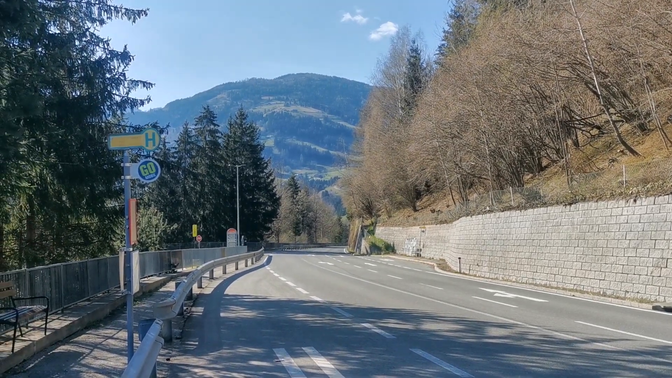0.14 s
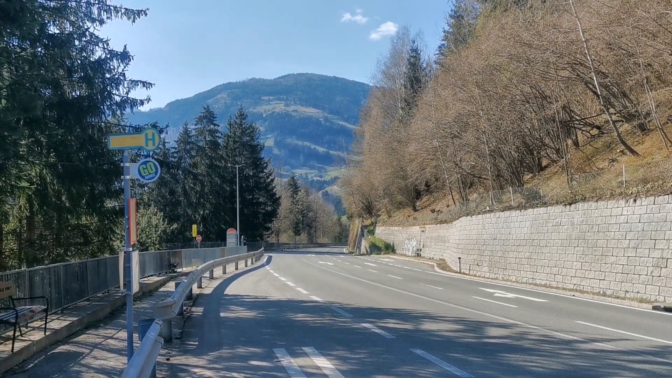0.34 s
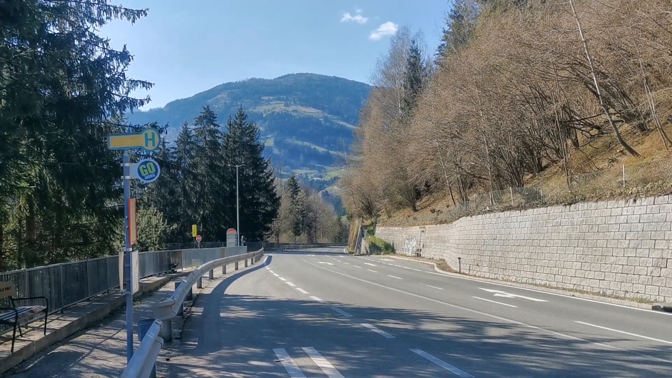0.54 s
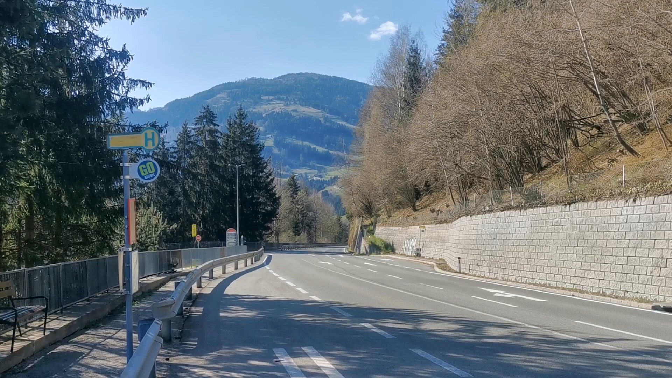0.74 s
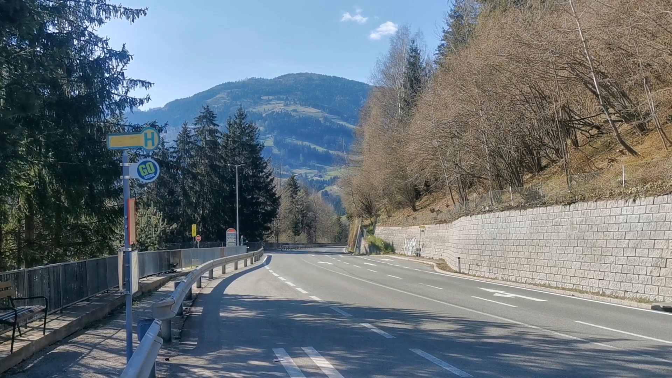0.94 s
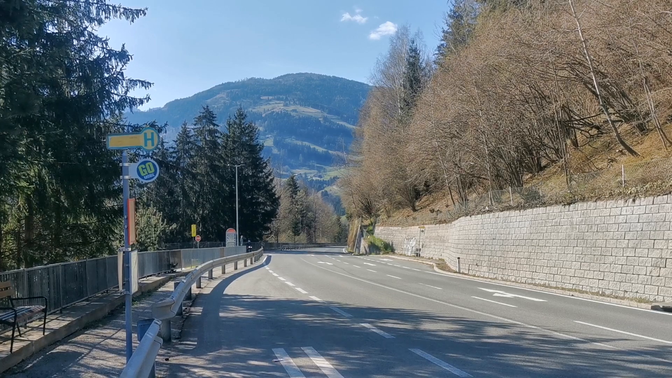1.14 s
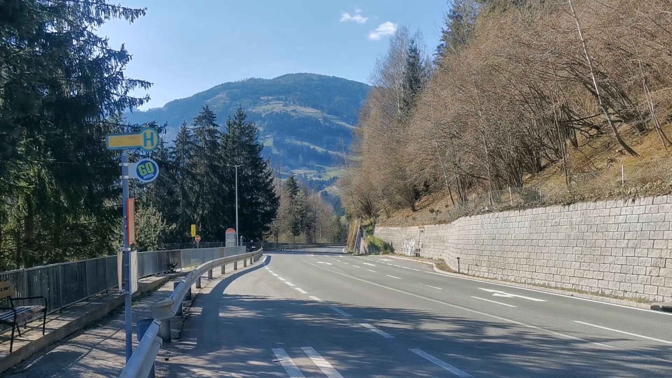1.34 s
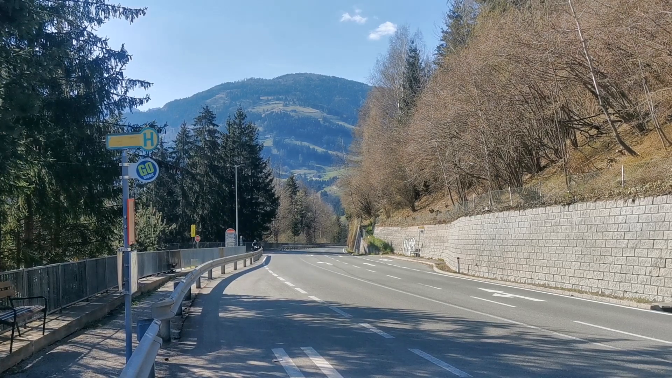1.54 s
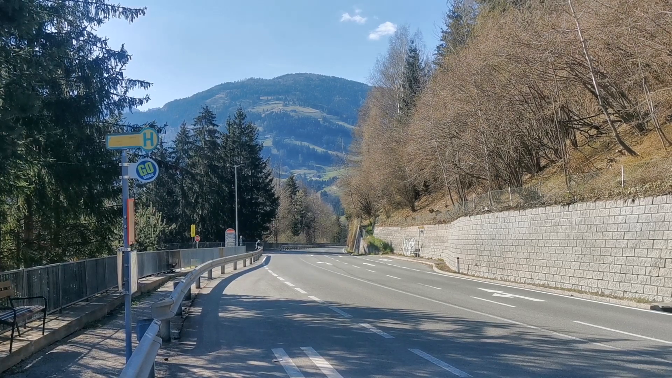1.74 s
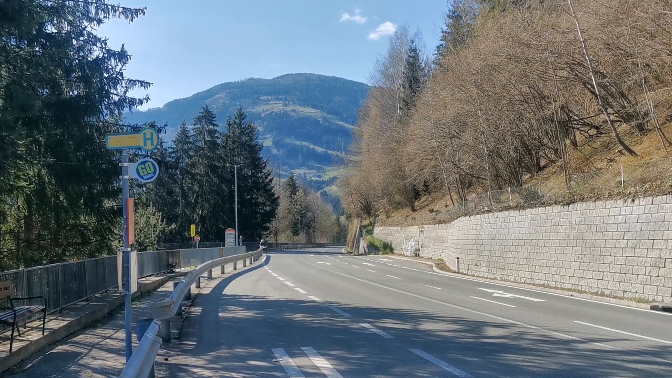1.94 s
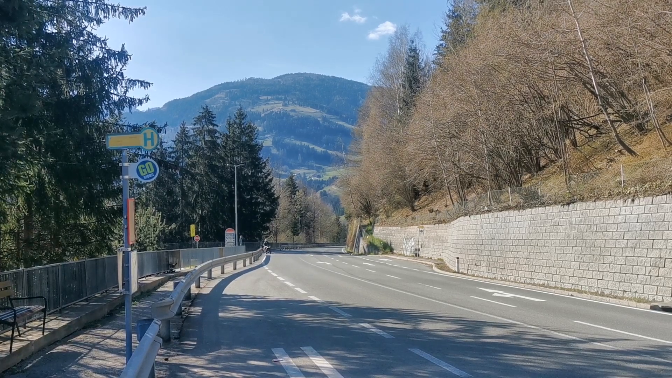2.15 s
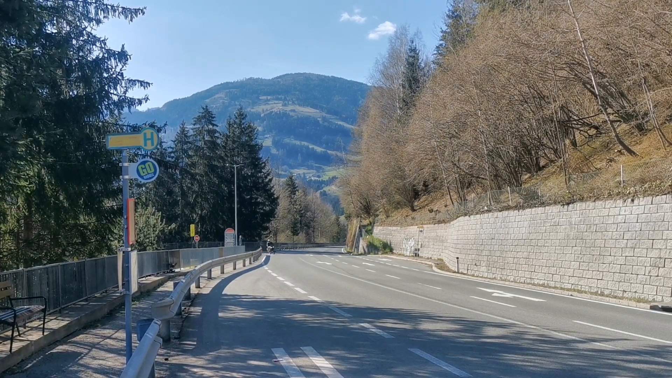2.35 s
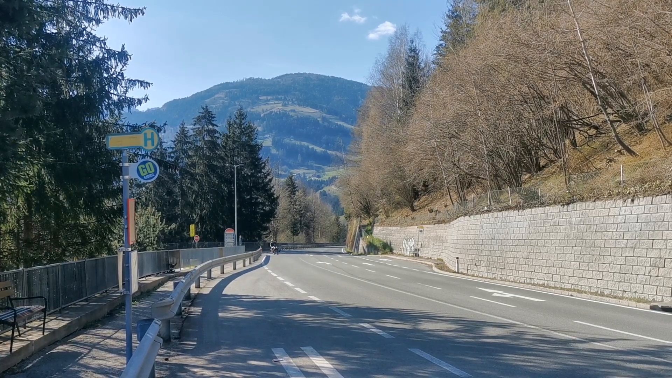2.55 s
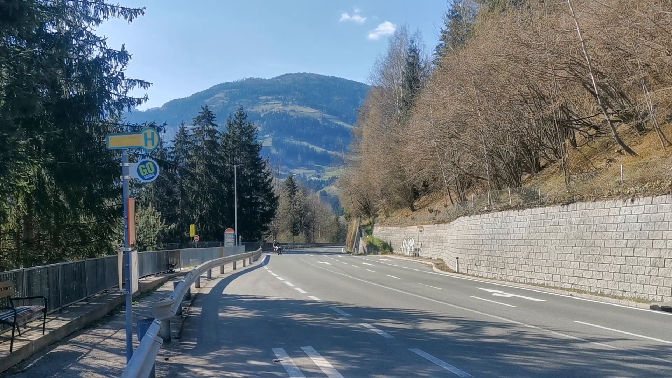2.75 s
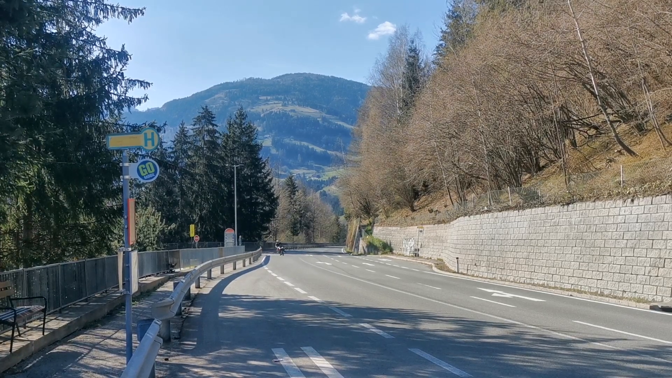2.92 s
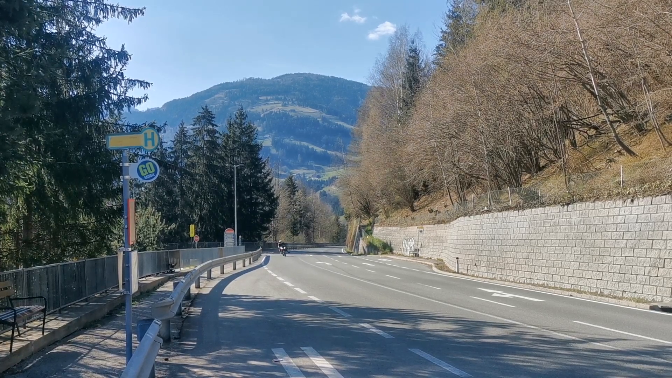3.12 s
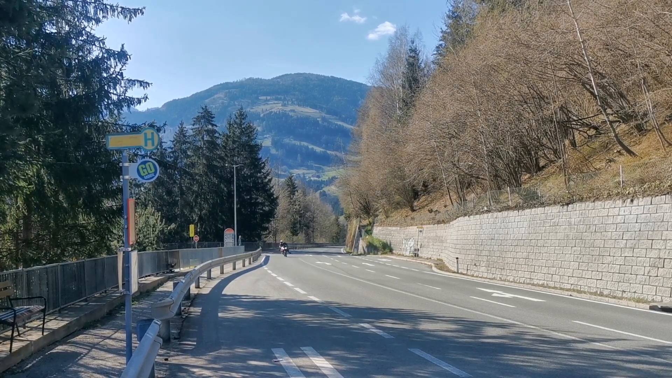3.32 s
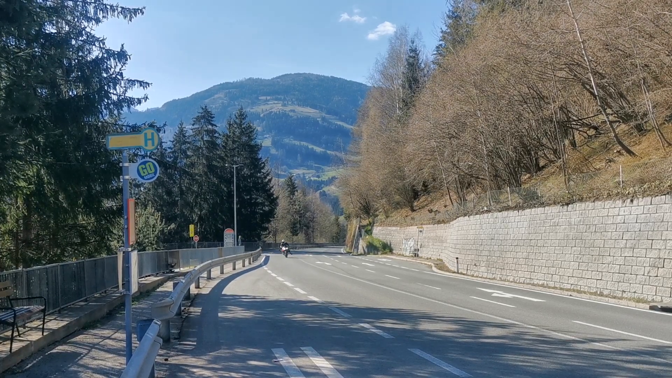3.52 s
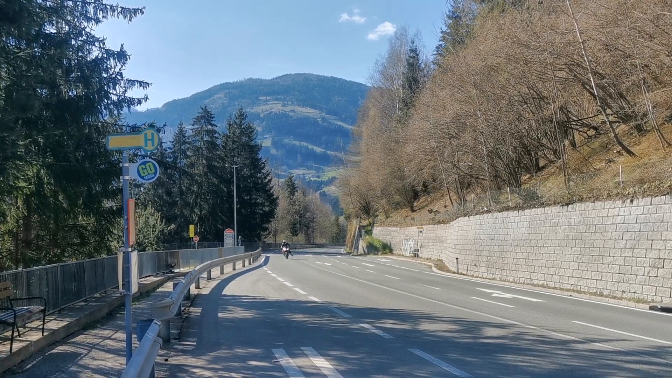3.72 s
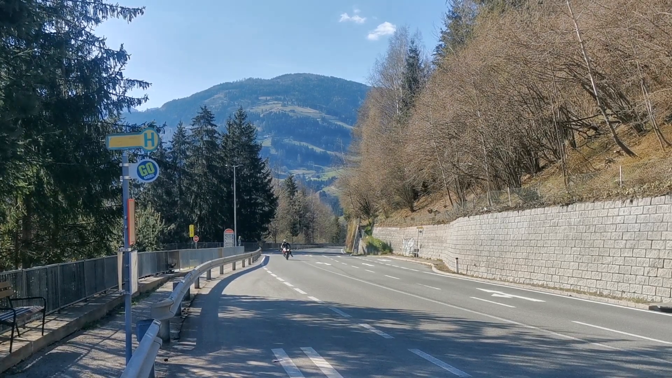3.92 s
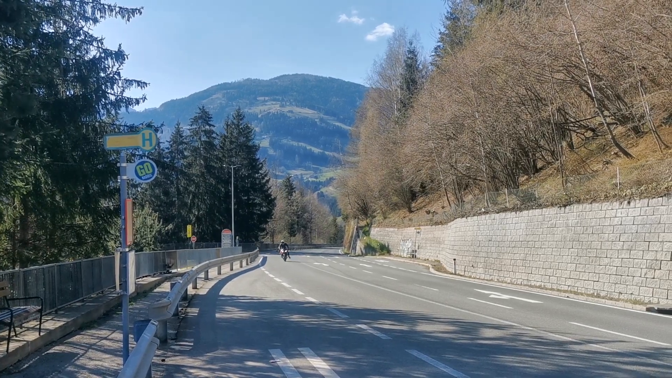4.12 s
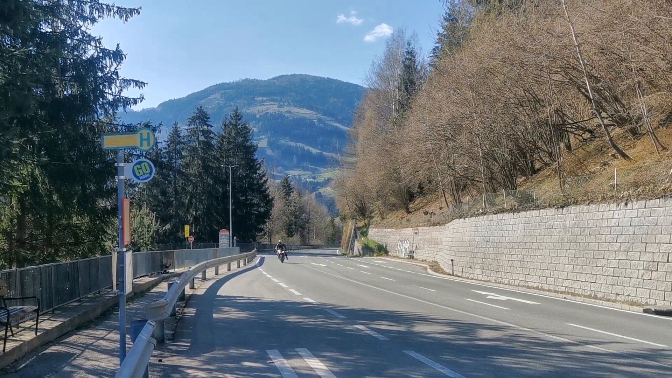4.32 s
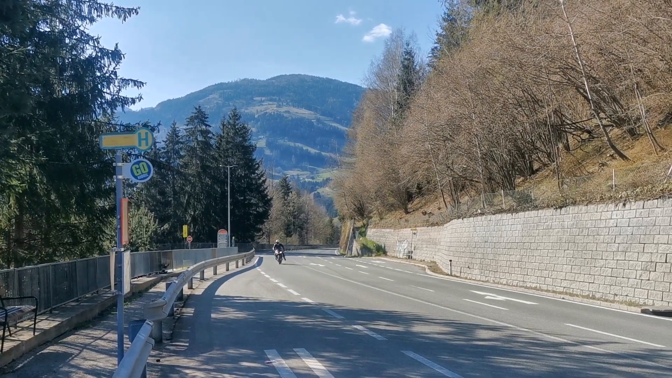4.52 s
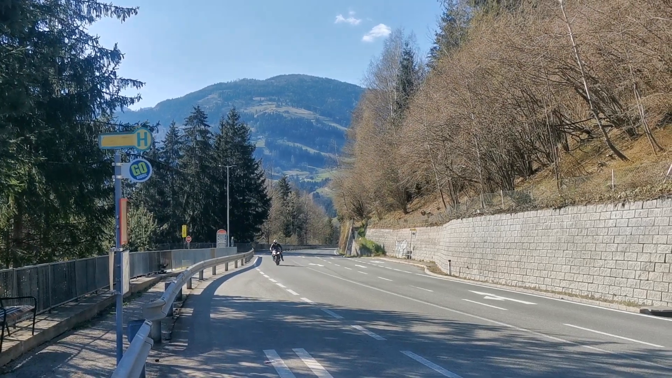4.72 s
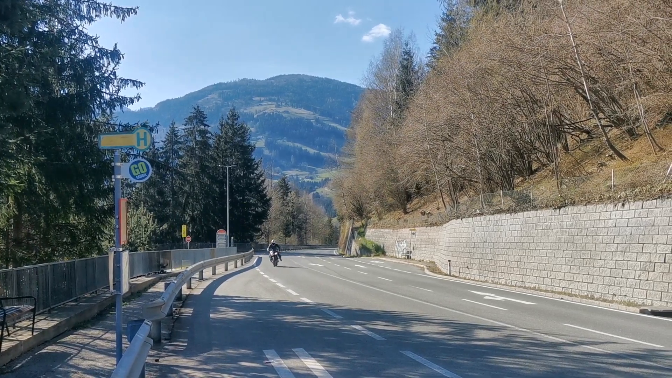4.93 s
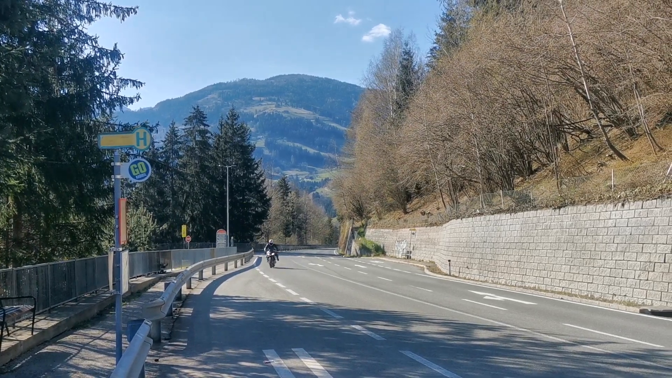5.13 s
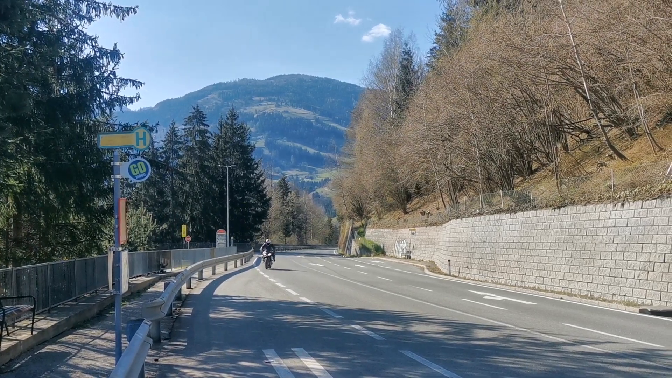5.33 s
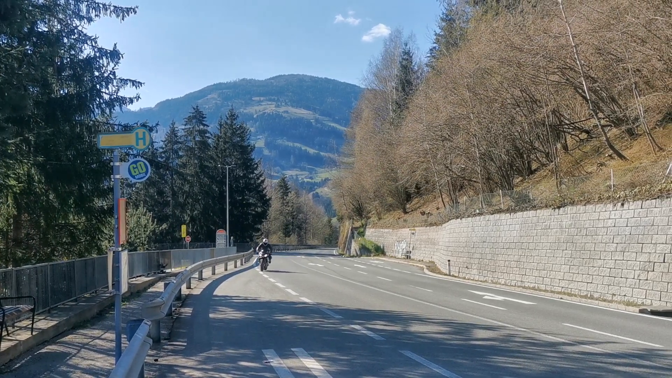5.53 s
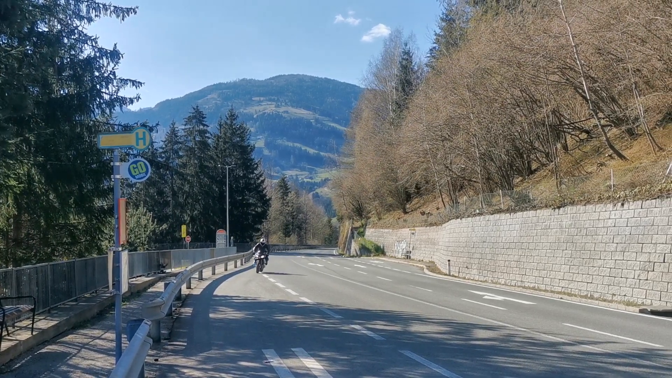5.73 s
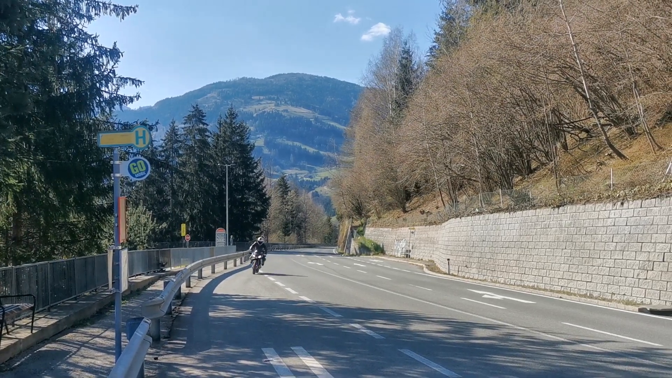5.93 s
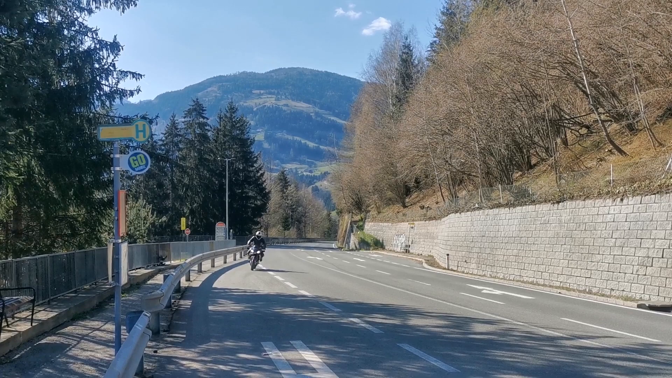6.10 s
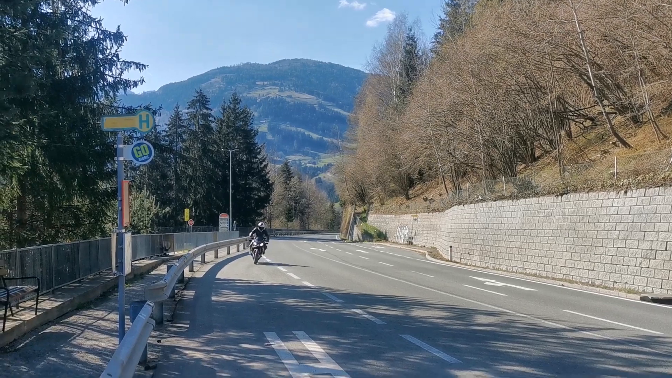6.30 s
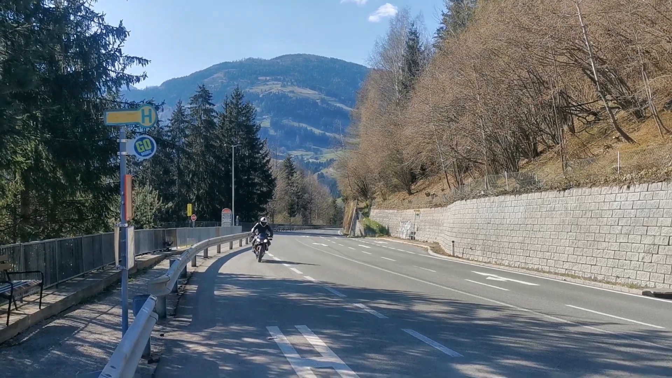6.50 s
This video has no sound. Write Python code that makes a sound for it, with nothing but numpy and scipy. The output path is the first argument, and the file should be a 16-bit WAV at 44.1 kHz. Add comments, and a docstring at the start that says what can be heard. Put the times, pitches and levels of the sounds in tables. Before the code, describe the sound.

Wind rumbles on the microphone as an approaching motorcycle accelerates, shuts its throttle and putters down with falling revs.

```python
"""Wind rumbles on the microphone over the low drone of a V-four motorcycle cruising down a mountain road.
Coming closer, the bike opens its throttle, shuts it and burbles on the overrun. Its uneven firings sing
as tones, their scatter burbles in the muffler, and gas rushes from the pipe; a stone wall and trees echo
it. Tyres and chain hiss, gusts buffet each port of the camera's stereo microphone, something ticks close
by and two faint whistles sound far off."""
import sys
import numpy as np
from scipy import signal
from scipy.fft import rfft, irfft, next_fast_len
from scipy.io import wavfile
from scipy.ndimage import uniform_filter1d, map_coordinates

SR = 44100
rng = np.random.default_rng(int(sys.argv[2]) if len(sys.argv) > 2 else 0)


def master(y):
    """Save y as 16-bit WAV."""
    cut = np.clip(np.atleast_2d(y).T, -1, 1)
    pcm = np.round(cut * 32767)  # scale
    wavfile.write(sys.argv[1], SR, pcm.astype(np.int16))


N = 289296
T = np.arange(N) / SR

# Far whistles. Each row: centre in seconds, length in seconds, pitch in Hz, level in dB.
WHISTLES = [(0.075, 0.059, 3640, -66.5), (1.57, .03, 8100, -83)]
# Close ticks. Each row: start in seconds, level in dB, low and high edge in Hz, seconds to fall 60 dB.
TICKS = [(1.034, -59, 4300, 5600, .01), (1.0407, -44, 1300, 4200, .012), (2.874, -44, 9500, 14000, .01)]
# Wind on the microphone. Each row: time in seconds, level in dB, leftward bias in dB.
WIND = [(0, -40.5, 4), (.36, -40, -21), (.46, -62, .5), (1.1, -54, -2), (2, -52, -4), (2.8, -49, 12),
        (3, -34, 7.5), (3.4, -36.5, -2), (4.3, -39, 3.5), (4.5, -56, 0.5), (5.1, -46, 10), (5.6, -39, 13),
        (6.56, -43, 9.5)]
# Its spectrum. Each row: frequency in Hz, density in dB.
RUMBLE_SPECTRUM = [(15, -16.5), (30, -10), (60, -1), (110, -10), (200, -25.5), (400, -42), (900, -80),
                   (2000, -140)]
# Gusts. Each row: centre and length in seconds, level in dB, upper edge in Hz, port (0 left, 1 right).
GUSTS = [(0.102, 0.13, -29, 180, 1), (0.273, 0.043, -28.5, 150, 1), (1.51, .04, -29.5, 160, 0),
         (2.193, 0.056, -37, 110, 1), (2.65, 0.082, -45, 110, 0), (2.897, 0.032, -28, 110, 1),
         (3.048, 0.047, -18.5, 170, 0), (3.16, 0.052, -26, 111, 0), (3.347, .05, -26.5, 110, 0),
         (3.378, .012, -18, 417, 1), (3.414, .047, -13, 382, 1), (3.409, .014, -18.5, 624, 1),
         (3.51, 0.11, -23, 150, 1), (3.62, .08, -20, 290, 1), (3.71, 0.068, -16.5, 170, 1),
         (3.832, 0.046, -31, 110, 1), (3.951, .1, -24, 250, 1), (4.127, .07, -28, 110, 0),
         (4.278, .1, -36, 150, 0), (4.662, 0.042, -31, 110, 1), (4.782, .05, -26, 110, 0),
         (5.153, 0.094, -32, 110, 0), (5.296, .045, -32, 110, 0), (5.413, 0.041, -25, 111, 0)]
# Level between the microphone ports. Each row: frequency in Hz, left over right in dB.
PORT_BALANCE = [(60, 5.5), (160, 5.5), (250, 3.5), (410, 2), (660, 2.5), (1060, 2.5), (1710, 4.5),
                (2760, 9), (4450, 1), (6500, 6), (8500, 14.5), (12000, 0)]
# Phase between them. Each row: frequency in Hz, lead of the left in radians.
PORT_PHASE = [(60, 0), (700, .1), (1120, .5), (1380, 2.2), (1640, .4), (1890, .8), (2150, 1.9), (2580, 6.7),
              (3360, 12.4), (4650, 13.3)]
# Road hiss. Each row: time in seconds, low band level in dB, middle and top band in dB relative to it.
HISS_LEVELS = [(0, -63.5, -12.5, -23.5), (.9, -61.5, -12, -24), (1.25, -55.5, -11, -27.5),
               (1.6, -56.5, -13, -22), (1.8, -60, -13.5, -21), (2.4, -58, -10.5, -21),
               (2.7, -53.5, -4, -22.5), (2.9, -50, -5.5, -16.5), (3.23, -46, -15.5, -20.5),
               (3.6, -48.5, -5, -14), (3.95, -42.5, -11, -21), (4.1, -44.5, -11, -19.5),
               (4.2, -50.5, -10, -14.5), (4.5, -47, -11, -14.5), (5, -43.5, -10, -16.5),
               (5.4, -44, -9.5, -13), (5.55, -45, -2, -7.5), (5.95, -44, -3.5, -12), (6.56, -45.5, -6, -12)]
# Where the hiss sits. Each row: time in seconds, left over right in dB.
HISS_PAN = [(0, -4.5), (1.2, -2), (2.6, -3), (2.85, 1.5), (4.5, -0.5), (6.56, 0)]
# How alike the hiss is at the two ports. Each row: frequency in Hz, correlation.
HISS_LIKENESS = [(400, 0.92), (700, 0.37), (1500, 0.43), (4000, 0.49), (9000, 0.23)]
# Spectra of the hiss: low and middle bands, then top band. Each row: frequency in Hz, density in dB.
ROAD_SPECTRUM = [(680, -21.5), (1150, -3.5), (1400, -5.5), (1890, -0.5), (2270, -6), (2580, -6), (2750, -4),
                 (3110, -9.5), (3840, -9), (4240, -12.5), (4900, -19), (6370, -43), (10800, -120)]
SIZZLE_SPECTRUM = [(3500, -29), (5000, -5), (5600, -8), (6500, -2.5), (7600, -11.5), (8200, -10),
                   (9000, -12.5), (9800, -17), (11500, -21.5), (15000, -31)]
# Narrow bands of hiss that stand out for a while.
# Each row: start and end in seconds, centre and width in Hz, level in dB, left over right in dB.
HISS_BANDS = [(1.033, 1.415, 2610, 400, -62, 13.5), (1.3, 1.654, 1790, 300, -67, 15),
              (3.28, 3.942, 3960, 199, -55, 0.5), (.2, 1.02, 1700, 250, -75, 3),
              (3.498, 3.957, 4370, 700, -62.5, 8), (3.75, 4.91, 1914, 299, -50, 0.5),
              (4.302, 4.9, 8150, 400, -76.5, 18), (4.8, 6.3, 3840, 355, -53, -0.5),
              (2.2, 3.4, 1240, 350, -64.5, 3), (2.7, 3.4, 6000, 1200, -68.5, 4),
              (5.3, 6.3, 2700, 400, -55.5, 6), (5.4, 5.95, 980, 90, -56, 2.5),
              (5.9, 6.7, 1150, 350, -51, 3)]
# Engine speed. Each row: time in seconds, cycles a second (a cycle is two crank turns).
REVS = [(0, 17.95), (.12, 18.1), (.3, 19.3), (.6, 20.4), (.8, 19.2), (.95, 19.05), (1.2, 19.64),
        (1.6, 21.04), (2, 22.66), (2.35, 24.7), (2.8, 29.4), (4.06, 46.1), (4.12, 46.4), (4.22, 44),
        (4.4, 43.77), (5.1, 38.17), (5.74, 33.43), (6.56, 28.07)]
# The throttle. Each row: time in seconds, opening from 0 to 1.
THROTTLE = [(0, 0.04), (2.3, 0.31), (2.95, 0.43), (3.15, 0.69), (4.13, 0.93), (4.2, 0.16), (6.56, 0.04)]
# The four firings of a cycle: their crank angles in degrees, then their strengths in dB.
FIRING_DEGREES = np.array([0, 180, 295, 475])
FIRING_DB = [1.6, -1.6, 1.6, -1.6]
# The exhaust from the roadside.
# Each row: time in seconds, loudness in dB, weak tones and gas rush in dB relative to it.
EXHAUST_LEVELS = [(0, -44.5, -0.5, -20.5), (.6, -44.5, 5.5, -19), (1.4, -46, 1.5, -14.5),
                  (2.3, -44.5, 2.5, -14.5), (2.6, -39.5, 0, -14), (3.05, -34.5, -8.5, -14),
                  (3.36, -29.5, -9.5, -15.5), (3.6, -30.5, -3.5, -10), (4.1, -29.5, -6.5, -10.5),
                  (4.3, -31, -10, -18.5), (4.9, -33, -12, -17.5), (5.3, -33, -19, -18.5),
                  (5.55, -31, -12.5, -14), (6.1, -33, -9.5, -14), (6.56, -35, -10.5, -11.5)]
# Strong tones. Each row: multiple of the cycle rate, gain in dB at light load, full load, throttle shut.
STRONG_ORDERS = [(3, -6.5, 5, -2.5), (4, -1.3, -0.3, 6.5), (5, 8, 3.5, 7), (7, -2, -6, -6), (8, 0, 0.5, -6)]
# Resonances they ring in. Each row: frequency in Hz, gain in dB with throttle open, then shut.
BOOM_RESPONSE = [(49.6, -9, 2.5), (85, -11, 10.5), (105.4, -2.5, -6), (124.4, 1, -4), (144.2, 3, 4),
                 (155.2, 5, 7), (170, 2, 2), (187.5, -2.1, -8.5), (190, -2.1, -5), (216.5, 5, -3.5),
                 (235, 5.5, 4.5), (250, 5.5, 3.5), (270.4, 2.5, 1), (294, -5, 9), (322.3, -6.5, -2),
                 (350, 2.5, -16), (370, -6, -8)]
# The pipe's weak tones. Each row: frequency in Hz, gain in dB at light load, full load, throttle shut.
PIPE_RESPONSE = [(30, -11, -9.5, -2), (120, -9.5, -8, 5.5), (190, 4, -1.5, 2), (250, 3, -11, -6),
                 (327.6, 3, 5.5, -7.5), (400, -16.5, -5.5, -5.5), (427, -25, -12, -31),
                 (590, -28.5, 3, -17), (670, -29.5, 8, -21), (764, -41.5, -3.5, -16.5),
                 (910, -43.5, -5, -26.5), (1220, -39.5, -22, -49.5)]
# The muffler. Each row: frequency in Hz, gain in dB.
MUFFLER_RESPONSE = [(30, -42), (70, -20.5), (110, -7), (155, -3), (210, -5), (300, -11), (400, -32),
                    (700, -39), (1300, -69.5), (3000, -82)]
# Its burble, in dB relative to the exhaust's loudness, at light load, full load and throttle shut.
BURBLE_DB = (0, -2.5, 2)
# Gas leaving the pipe. Each row: frequency in Hz, density in dB.
RUSH_SPECTRUM = [(250, -26.5), (420, 5.5), (471, -13.5), (557, 0), (1000, -2.5), (1250, -17.5),
                 (1620, -45.5), (2750, -120)]
# Puttering, deepest on the overrun. Each row: time in seconds, depth from 0 to 1.
PUTTER_DEPTH = [(0, 0), (.4, .08), (4.1, 0), (4.25, 0.22), (4.9, 0.27), (5.03, 0.46), (5.2, 0.64),
                (5.26, 0.1), (5.42, 0.4), (5.62, 0.4), (5.85, 0.16), (6.05, 0.27), (6.3, 0.2), (6.56, 0.6)]

SHUT_S = 4.17  # the throttle closes for the overrun
SHUT = 1 / (1 + np.exp((SHUT_S - T) / .006))  # 0 before, 1 after
SIDES = np.array([[.5], [-.5]])  # splits a difference between the left and right ports


def amp(db):
    """Decibels as amplitude."""
    return 10 ** (np.asarray(db) / 20)


def unit(x):
    """x at rms 1."""
    return x / np.sqrt(np.mean(x ** 2) + 1e-20)


def even(x, span_s):
    """x held near rms 1 over every stretch of span_s."""
    n = int(span_s * SR)
    power = uniform_filter1d(uniform_filter1d(x ** 2, n), n)
    return x / np.sqrt(np.abs(power) + 1e-20)


def along(points, hz):
    """Values between (Hz, value) points on a log axis."""
    f, v = np.transpose(points)
    return np.interp(np.log(hz + 1), np.log(f + 1), v)


def curves(rows):
    """One value per sample for each column after the time."""
    times, *columns = np.transpose(rows)
    return [np.interp(T, times, column) for column in columns]


def wobble(rate):
    """A smooth random curve, rate knots a second."""
    return map_coordinates(rng.standard_normal(int(N * rate / SR) + 4), [T * rate])


def filtered(x, response):
    """x through a complex response of frequency."""
    size = next_fast_len(N + SR // 2)
    return irfft(rfft(x, size) * response(np.fft.rfftfreq(size, 1 / SR)), size)[..., :N]


def causal(points):
    """The minimum-phase response that has this spectrum."""
    def response(hz):
        cepstrum = irfft(np.log(amp(np.maximum(along(points, hz), -90))))
        cepstrum[1:len(hz)] *= 2
        cepstrum[len(hz):] = 0
        return np.exp(rfft(cepstrum))
    return response


def ports(x):
    """Sound reaches the microphone's two ports at different levels and phases."""
    def response(hz):
        return amp(SIDES * along(PORT_BALANCE, hz)) * np.exp(1j * SIDES * along(PORT_PHASE, hz))
    return filtered(x, response)


def by_load(light, full, shut):
    """A value that moves with the throttle."""
    opening = curves(THROTTLE)[0]
    return opening * full + (1 - opening) * (light + SHUT * (shut - light))


def whistles():
    """Faint wavering whistles, far off to the left."""
    out = np.zeros((2, N))
    for centre, length, hz, db in WHISTLES:
        swell = np.exp(-((T - centre) / length * 2) ** 4)
        out += amp(db + 6 * SIDES) * swell * np.sin(2 * np.pi * hz * T + 1.5 * wobble(60))
    return out


def ticks():
    """Dry snaps of noise close to the microphone."""
    out, t = np.zeros((2, N)), np.arange(800) / SR
    for start, db, low_hz, high_hz, t60 in TICKS:
        band = signal.butter(4, [low_hz, high_hz], "band", fs=SR, output="sos")
        snap = unit(signal.sosfilt(band, rng.standard_normal(len(t))))
        at = int(start * SR)
        out[:, at:at + len(t)] += amp(db - 60 * t / t60) * snap
    return out


def wind():
    """Air buffets each port separately: a lumpy rumble and sharp gusts that reach higher."""
    level_db, bias_db = curves(WIND)
    lumps = amp(2.2 * np.array([wobble(20), wobble(13)]))
    rumble = filtered(rng.standard_normal((2, N)), lambda hz: amp(along(RUMBLE_SPECTRUM, hz)))
    port_power = 4.6 / (0.5 + 10 ** (-2 * SIDES * bias_db / 10))
    out = amp(level_db) * np.sqrt(port_power) * unit(lumps * rumble)
    for centre, length, db, edge_hz, port in GUSTS:
        band = signal.butter(3, [35, edge_hz], "band", fs=SR, output="sos")
        span = slice(max(int((centre - length) * SR), 0), int((centre + length) * SR))
        puff = unit(signal.sosfilt(band, rng.standard_normal(SR // 2))[-len(T[span]):])
        out[port, span] += amp(db) * puff * np.exp(-((T[span] - centre) / length * 2) ** 8)
    return out


def echoes(x, t60=.5):
    """The stone wall and the trees return a short smeared copy, different at each port."""
    t = np.arange(SR // 2) / SR
    tail = rng.standard_normal((2, len(t))) * amp(-60 * t / t60) * (t > .01)
    return signal.fftconvolve(x[None], tail / np.linalg.norm(tail[0]), axes=1)[:, :N]


def patchy_noise():
    """Noise mottled in time and frequency, partly alike at the two ports."""
    def mid_and_side(hz):
        angle = np.arccos(along(HISS_LIKENESS, hz)) / 2
        return np.array([np.cos(angle), np.sin(angle)])
    spectra = signal.stft(rng.standard_normal((2, N)), nperseg=512)[2]
    patches = uniform_filter1d(uniform_filter1d(rng.standard_normal(spectra.shape[1:]), 5, 0), 12, 1)
    pair = signal.istft(spectra * amp(1.1 * unit(patches)), nperseg=512)[1][:, :N]
    mid, side = filtered(pair, mid_and_side)
    return ports(np.array([mid + side, mid - side]))


def road_hiss(split_hz=3050):
    """Tyres, chain and air hiss from the road in three broad bands, growing as the bike nears."""
    noise = patchy_noise()
    low = filtered(noise, lambda hz: amp(along(ROAD_SPECTRUM, hz)) / (1 + (hz / split_hz) ** 8))
    middle = filtered(noise, lambda hz: amp(along(ROAD_SPECTRUM, hz)) / (1 + (split_hz / (hz + 1)) ** 8))
    top = filtered(noise, lambda hz: amp(along(SIZZLE_SPECTRUM, hz)))
    level_db, middle_db, top_db = curves(HISS_LEVELS)
    blend = unit(low) + amp(middle_db) * unit(middle) + amp(top_db) * unit(top)
    return amp(level_db + 0.68 * wobble(12) + SIDES * curves(HISS_PAN)[0]) * blend


def hiss_bands():
    """Narrow bands of noise swell out of the road hiss and sink back."""
    out = np.zeros((2, N))
    for start, end, centre_hz, width_hz, db, pan_db in HISS_BANDS:
        ring = filtered(rng.standard_normal(N), lambda hz: 1 / (1 + ((hz - centre_hz) / width_hz * 2) ** 2))
        swell = np.sin(np.pi * np.clip((T - start) / (end - start), 0, 1)) ** 0.53
        out += amp(db + 0.66 * wobble(22) + SIDES * pan_db) * swell * unit(ring)
    return out


def muffler_burble(cycle):
    """Each firing's random scatter in strength is an impulse that rings the muffler."""
    scatter = rng.standard_normal((int(cycle[-1]) + 1, len(FIRING_DEGREES)))
    firing_cycles = np.arange(len(scatter))[:, None] + FIRING_DEGREES / 720
    at = np.interp(firing_cycles, cycle, np.arange(N)).ravel().astype(int)
    impulses = np.bincount(at, scatter.ravel() * (at < N - 1), N)
    return even(filtered(impulses, causal(MUFFLER_RESPONSE)), span_s=0.14)


def gas_rush():
    """The noise of gas leaving the pipe."""
    return unit(filtered(rng.standard_normal(N), lambda hz: amp(along(RUSH_SPECTRUM, hz))))


def misfires(cycle):
    """Gains for a misfire every second cycle: the ring builds, gas spits out, the ring collapses."""
    depth = curves(PUTTER_DEPTH)[0]
    beat = 2 * np.pi * (cycle / 2 + .03 * wobble(5) + .48)
    putter = 1 + depth * (0.76 * np.sin(beat) - 0.57 * np.sin(2 * beat))
    spit = 1 + 3.5 * SHUT * depth * np.maximum(np.cos(beat - 2.6), 0) ** 4
    return putter, spit


def firing_tones(revs, cycle, weak_db):
    """The regular part of four unevenly spaced firings sings at multiples of the cycle rate."""
    opening = curves(THROTTLE)[0]
    lull_db = -12.5 * np.exp(-((T - 5.45) / 0.4) ** 4)  # the upper strong tones fade for a while
    strong_db = {order: load_db for order, *load_db in STRONG_ORDERS}
    boom_hz, open_db, shut_db = np.transpose(BOOM_RESPONSE)
    pipe_hz, *pipe_db = np.transpose(PIPE_RESPONSE)
    strong, weak = np.zeros(N), np.zeros(N)
    for order in range(1, 27):
        hz = order * revs
        firing_sum = np.sum(amp(FIRING_DB) * np.exp(-2j * np.pi * order * FIRING_DEGREES / 720))
        tone = -np.sqrt(2) * np.cos(2 * np.pi * order * cycle + np.angle(firing_sum))
        if order in strong_db:
            boom_db = (1 - SHUT) * np.interp(hz, boom_hz, open_db) + SHUT * np.interp(hz, boom_hz, shut_db)
            level_db = by_load(*strong_db[order]) + boom_db + lull_db * (order > 6)
            strong += amp(level_db + .9 * wobble(5.4)) * tone
        else:
            level_db = by_load(*(np.interp(hz, pipe_hz, column) for column in pipe_db))
            # weak firings blur the pattern, bar the multiples that cancel
            contrast = 1 if order % 8 == 6 else 0.26 + .5 * opening
            weight = max(abs(firing_sum), .3 * (order % 2)) ** contrast
            weak += weight * amp(level_db + 1.5 * wobble(5)) * tone
    return strong + amp(weak_db) * even(weak, span_s=0.59)


def exhaust():
    """Tones, burble and gas rush leave the pipe together, following the revs and the throttle."""
    revs = curves(REVS)[0]
    cycle = np.cumsum(revs) / SR
    loud_db, weak_db, rush_db = curves(EXHAUST_LEVELS)
    tones = firing_tones(revs, cycle, weak_db)
    burble = amp(by_load(*BURBLE_DB)) * muffler_burble(cycle)
    rush = amp(rush_db) * gas_rush()
    putter, spit = misfires(cycle)
    # the firings almost stop as the throttle closes
    falter = amp(-13 * np.exp(-((T - SHUT_S - 0.013) / 0.049) ** 2))
    return amp(loud_db) * (falter * putter * tones + burble + spit * rush)


def scene():
    """From the roadside: the bike, its echo and its hiss dip briefly under the hardest gust."""
    bike = exhaust()
    road = amp(-17) * echoes(bike) + ports(bike) + road_hiss() + hiss_bands()
    dip_s, dip_db, fall_s, return_s = 3.43, -9, 0.038, 0.059
    dip = amp(dip_db * np.exp(-np.abs(T - dip_s) / np.where(T < dip_s, fall_s, return_s)))
    return dip * road + wind() + ticks() + whistles()


def record(dry, top_hz=15720):
    """The camera adds a faint hiss of its own and keeps nothing above its band limit."""
    return filtered(dry + amp(-77.5) * rng.standard_normal(dry.shape), lambda hz: hz < top_hz)


dry = scene()
out = record(dry)
master(out)
```